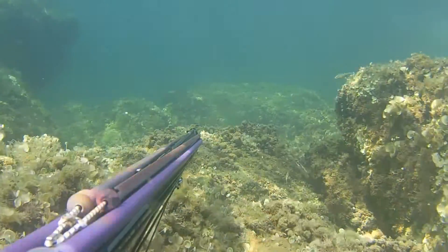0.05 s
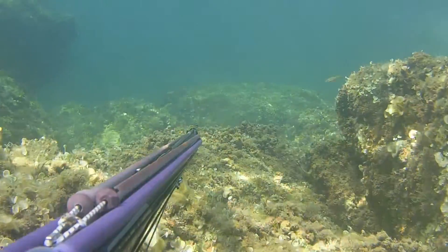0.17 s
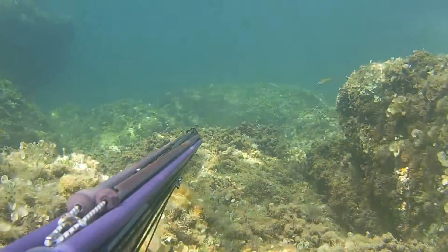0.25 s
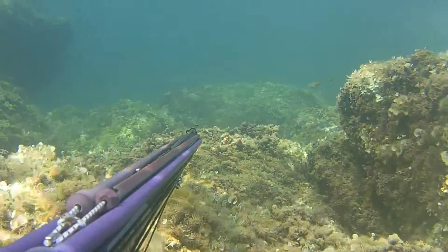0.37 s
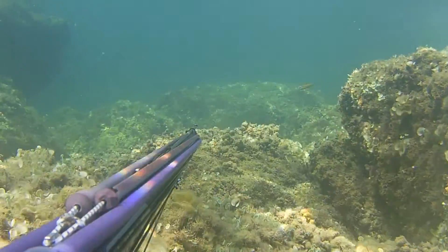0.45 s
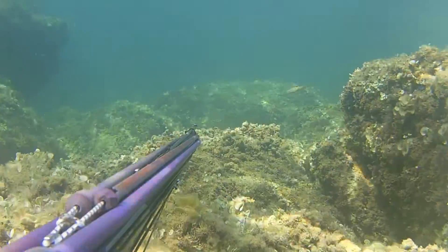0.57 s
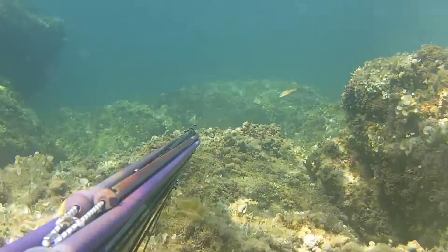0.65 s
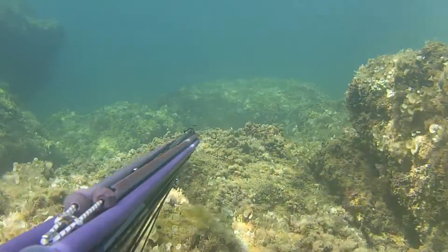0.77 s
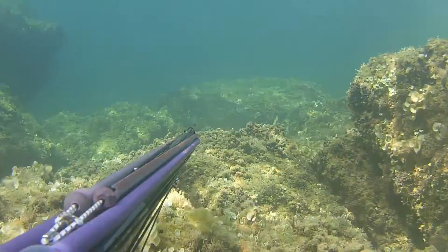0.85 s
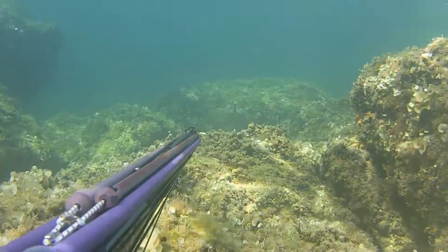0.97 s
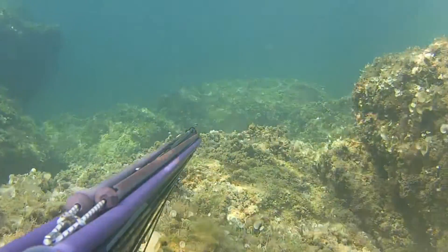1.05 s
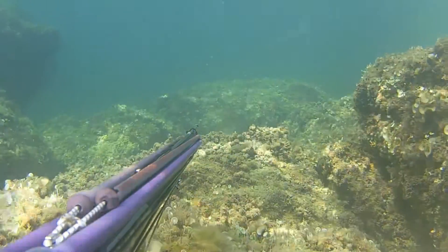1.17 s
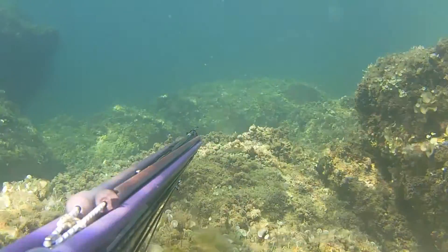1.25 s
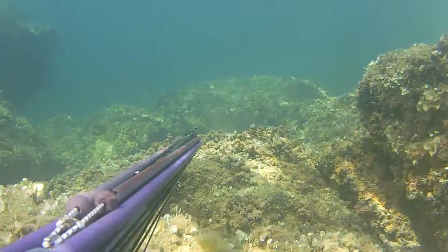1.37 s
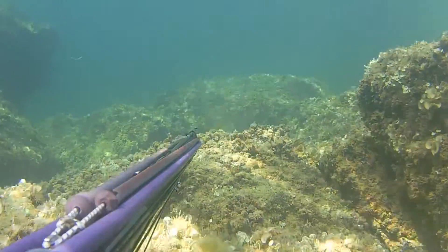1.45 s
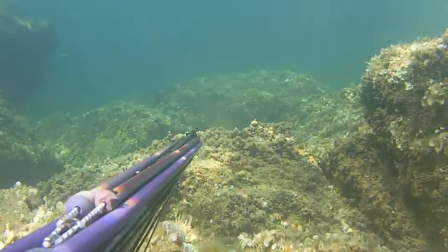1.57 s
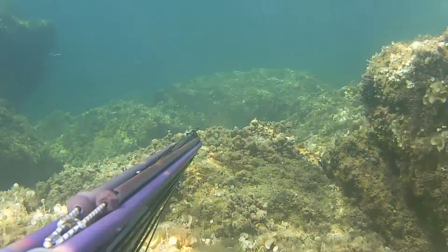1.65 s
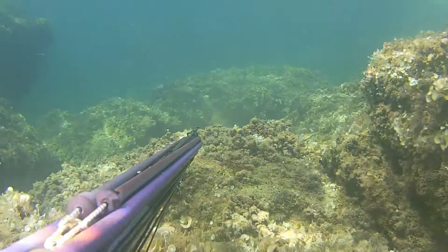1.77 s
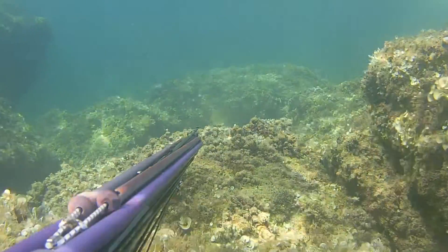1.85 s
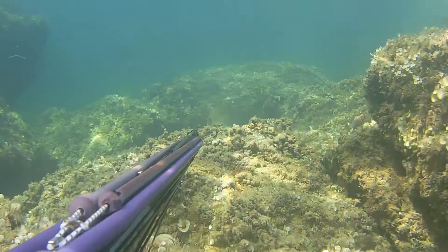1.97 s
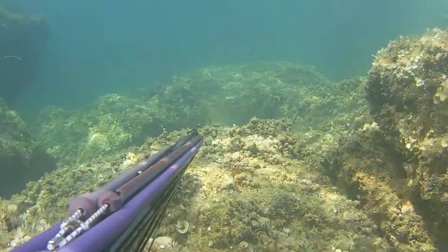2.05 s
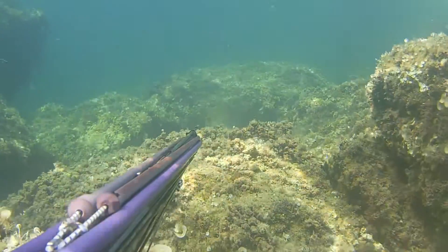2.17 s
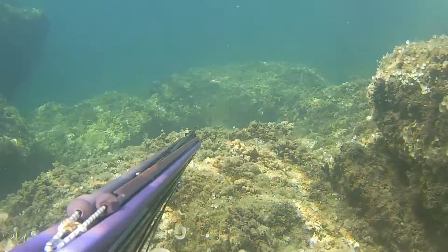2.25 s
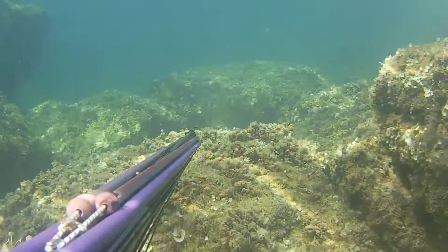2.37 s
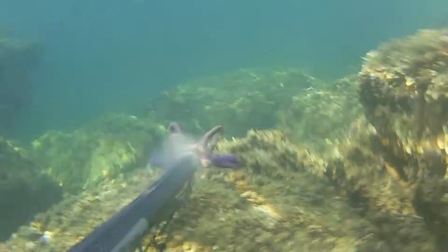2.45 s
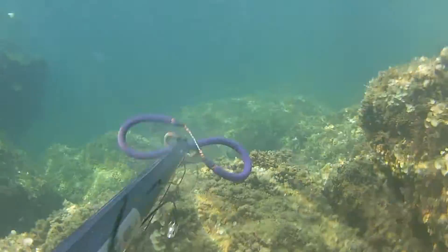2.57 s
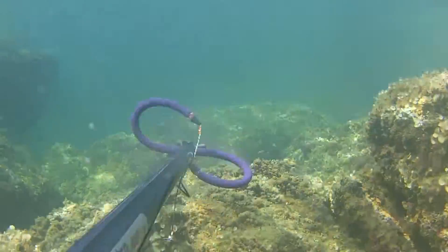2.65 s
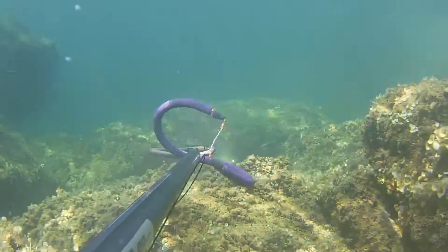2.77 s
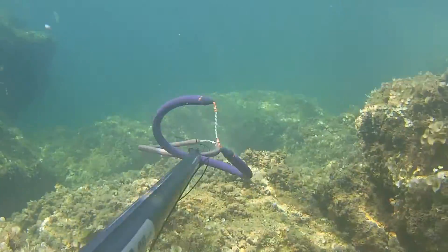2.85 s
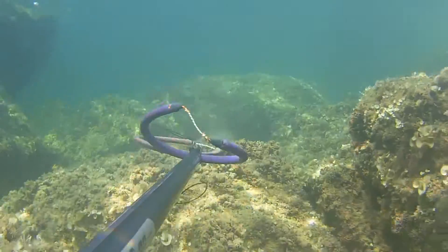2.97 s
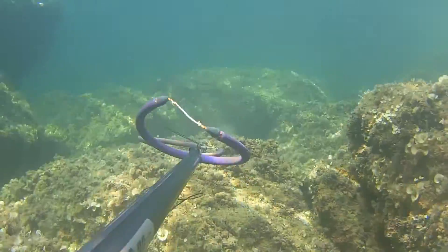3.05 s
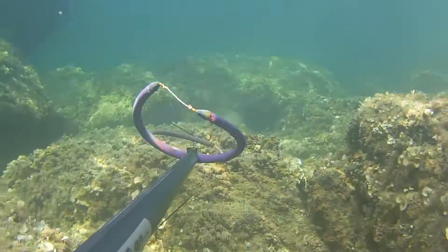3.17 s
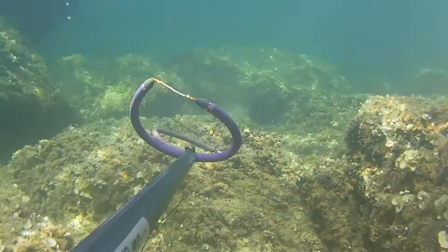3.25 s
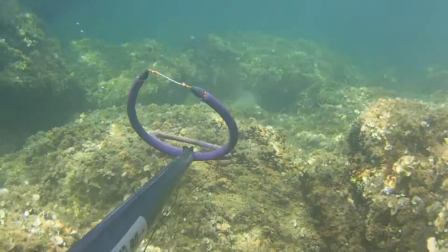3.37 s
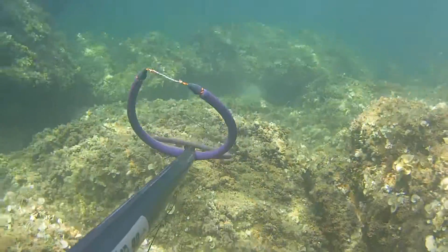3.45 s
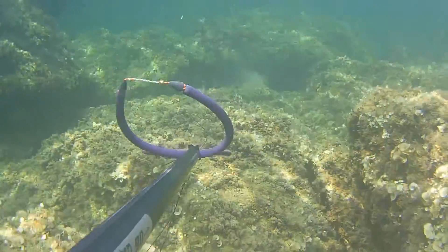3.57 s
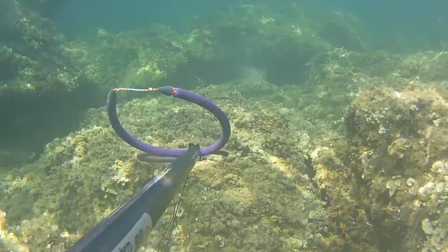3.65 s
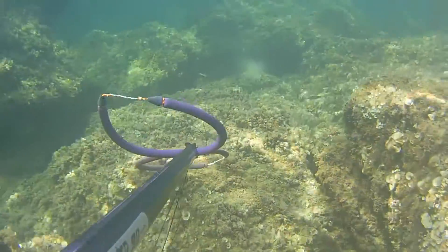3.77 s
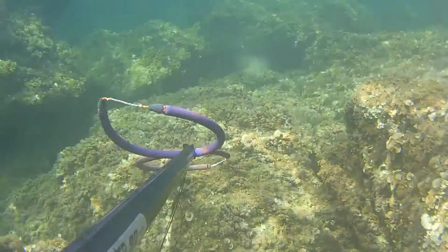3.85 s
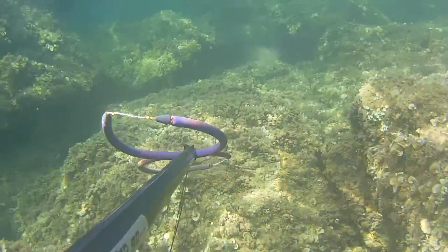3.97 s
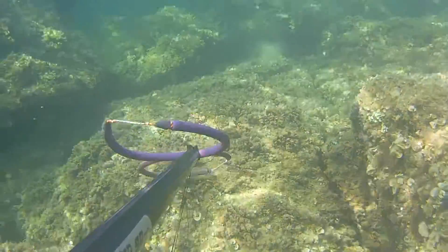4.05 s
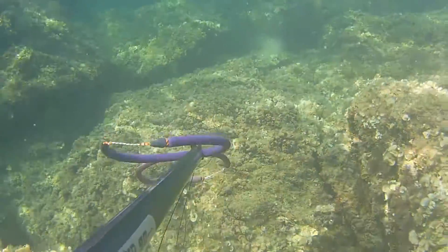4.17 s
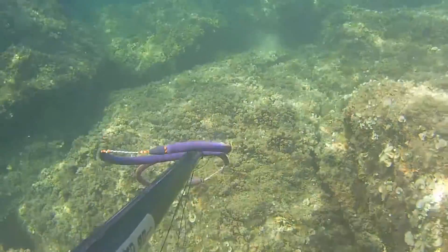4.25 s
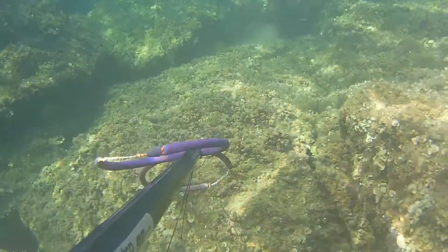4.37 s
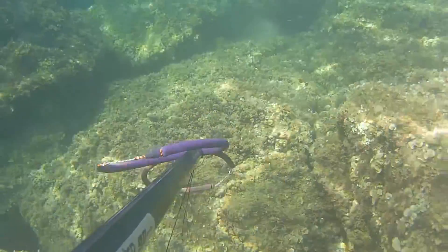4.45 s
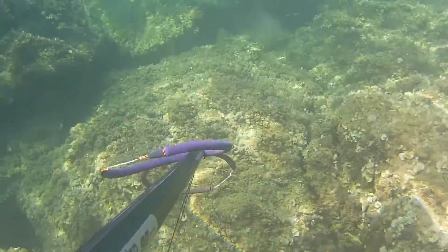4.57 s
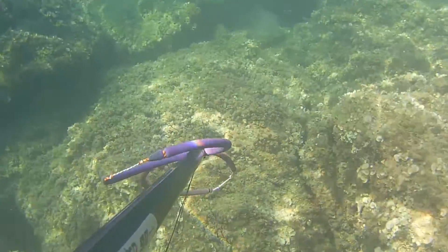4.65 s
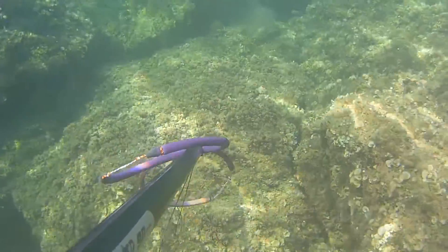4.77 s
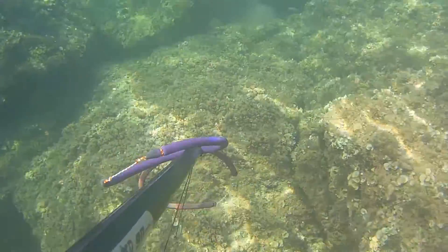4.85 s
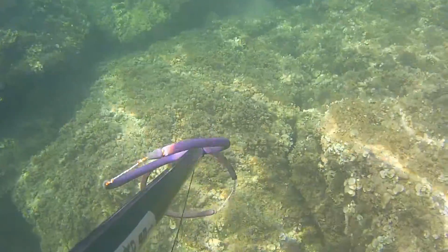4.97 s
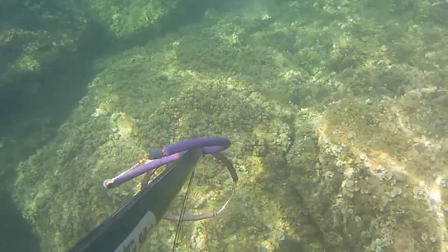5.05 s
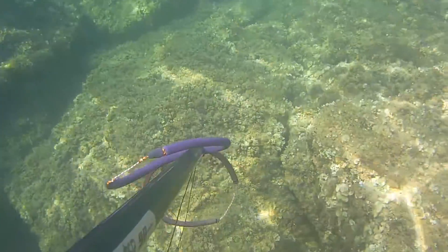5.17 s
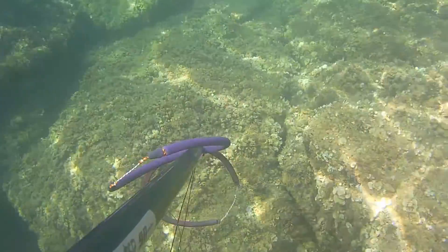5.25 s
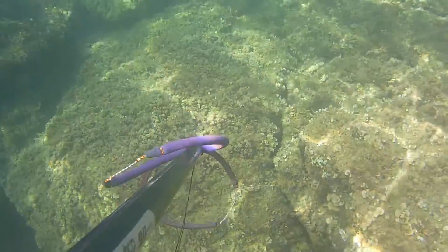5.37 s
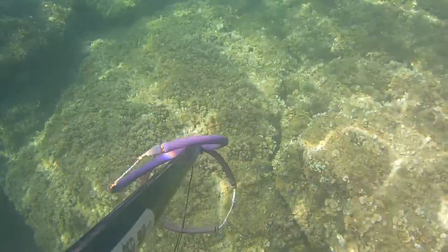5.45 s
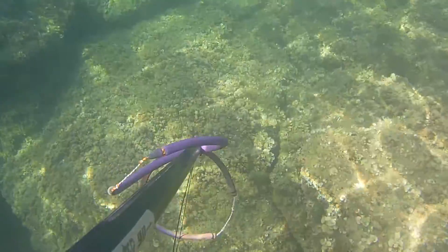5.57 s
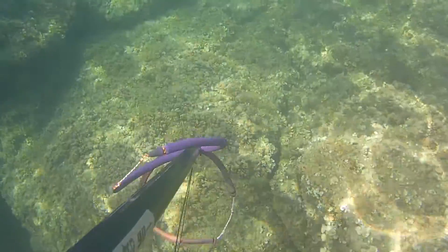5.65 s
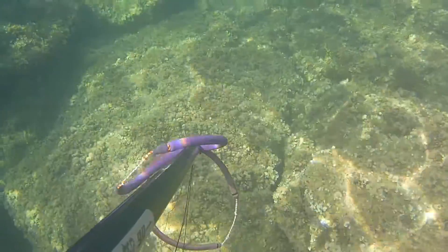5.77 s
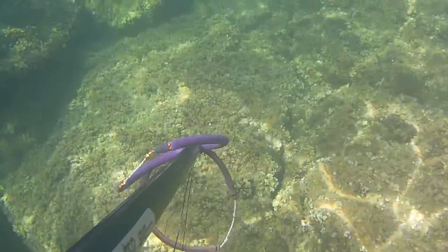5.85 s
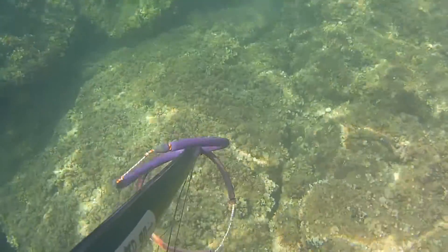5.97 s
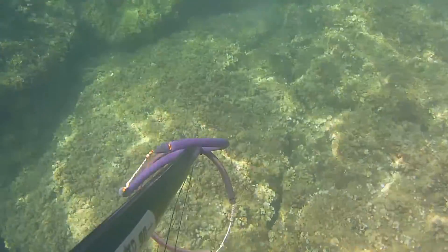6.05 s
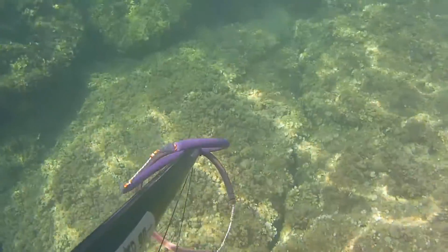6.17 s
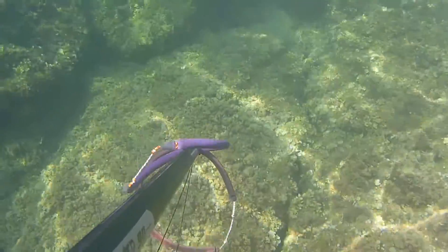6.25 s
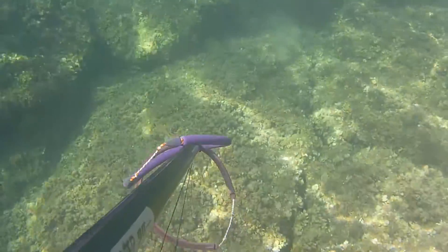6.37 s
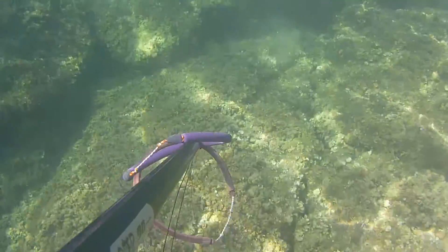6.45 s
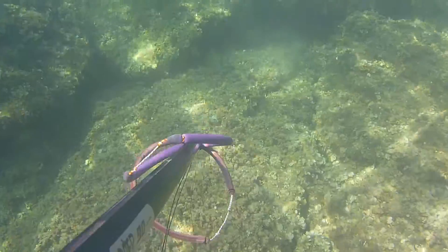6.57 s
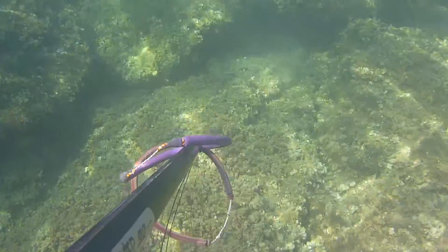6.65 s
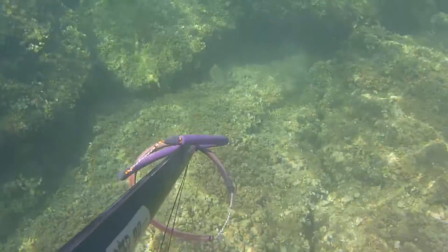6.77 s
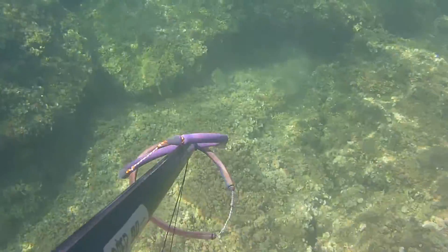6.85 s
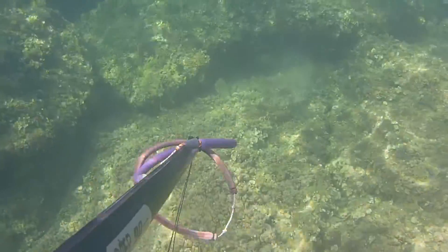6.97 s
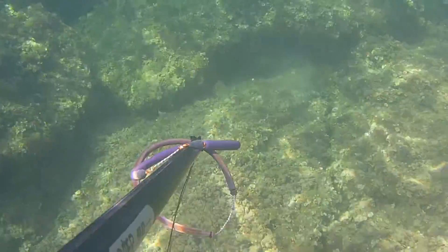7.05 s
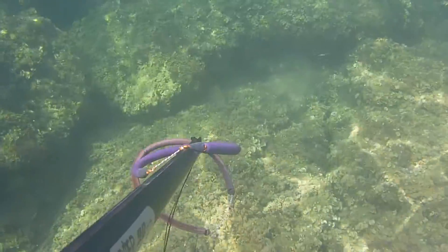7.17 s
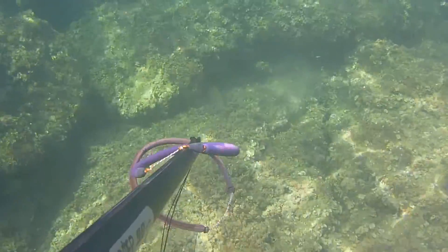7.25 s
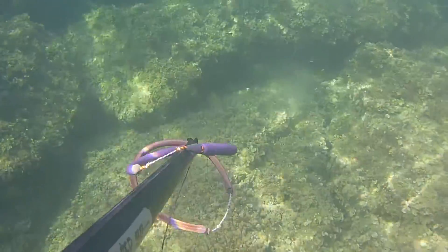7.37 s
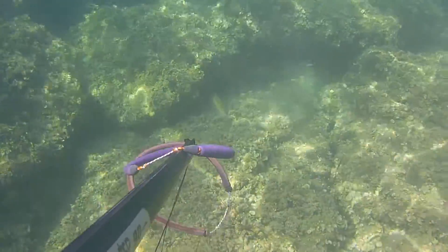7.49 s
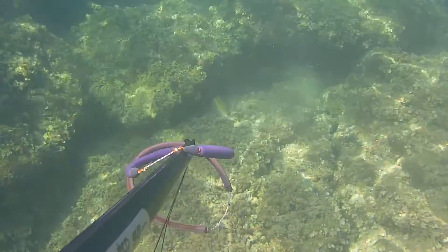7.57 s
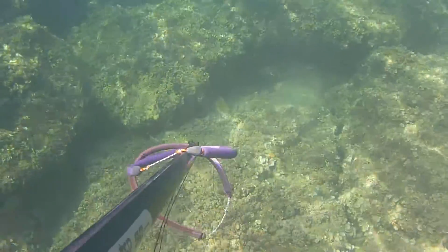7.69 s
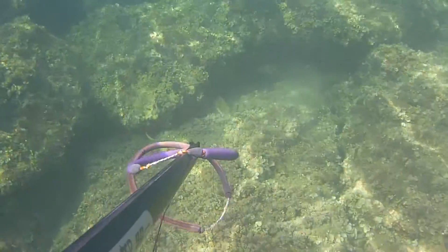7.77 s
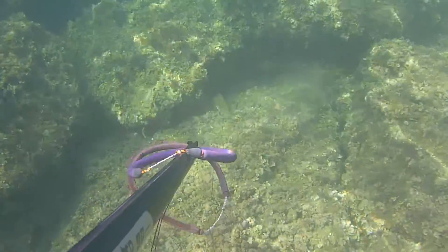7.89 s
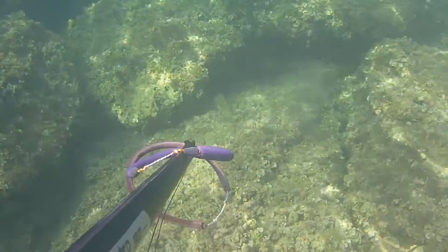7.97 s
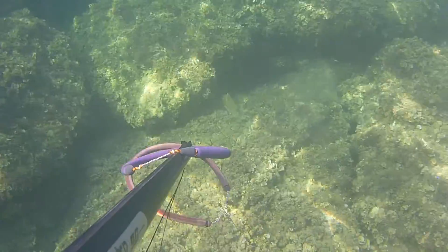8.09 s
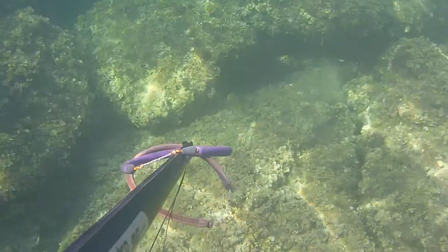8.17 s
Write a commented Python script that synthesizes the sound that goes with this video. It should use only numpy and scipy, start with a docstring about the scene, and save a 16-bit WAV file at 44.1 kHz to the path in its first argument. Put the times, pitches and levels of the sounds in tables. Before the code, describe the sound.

A speargun fires underwater with one loud, sharp crack and thump, over faint scattered clicks and a low water hiss.

```python
"""A rubber-band speargun fires under water, heard from a sealed housing fixed to the gun.
Release, sliding spear and slapping bands ring the barrel's modes and overload the microphone input;
recoil swings the mount. Hand and slack line rub the gun, reef shrimp snap and ring the housing,
and water surges over a steady hiss."""
import sys
import numpy as np
from scipy import signal
from scipy.fft import rfft, irfft
from scipy.io import wavfile

SR = 44100
rng = np.random.default_rng(int(sys.argv[2]) if len(sys.argv) > 2 else 0)


def digitize_waveform(pressure):
    """Quantize a signal to 16-bit integers and store it at the path in sys.argv[1].

    Rows of a 2-D input are taken as channels; values are limited to [-1, 1].
    """
    field = np.atleast_2d(pressure).T
    bounded = np.clip(field, -1, 1)
    quanta = np.round(bounded * 32767).astype(np.int16)
    wavfile.write(sys.argv[1], SR, quanta)


N = 362502

# barrel modes: (frequency [Hz], struck level [dB], rubbed level [dB], t60 [s])
BARREL_MODES = [(289, -12, -16, 0.12), (389, -8, -8, 0.021), (538, -1, -21, 0.017), (609, -7, -24, 0.047),
                (673, -1, 0.5, 0.094), (714.5, -4.5, -20, 0.062), (905, -7.5, -32, 0.022),
                (1097, -6.5, -17, 0.017), (1352, -4, -8, 0.023), (1520, -5.5, -20, .03),
                (1730, -5.5, -29, 0.017), (1986, -25, -11.5, 0.039), (2428, -17.5, -9.5, 0.043),
                (3180, -15.5, -23, 0.011), (3660, -21, -20, 0.03), (4530, -16.5, -26, 0.0081)]


def from_db(db):
    return 10 ** (np.asarray(db) / 20)


def unit_rms(x):
    return x / np.sqrt(np.mean(x ** 2) + 1e-20)


def envelope(times_s, levels_db):
    """Gain through dB points, silent outside them."""
    return from_db(np.interp(np.arange(N) / SR, times_s, levels_db, left=-200, right=-200))


def add(track, time_s, sound):
    start = round(time_s * SR)
    track[start:start + len(sound)] += sound[:N - start]


def ring(force, hz, t60_s):
    """One mode: a unit impulse starts a decaying unit sine."""
    radius = from_db(-60 / (t60_s * SR))
    angle = 2 * np.pi * hz / SR
    return signal.lfilter([0, np.sin(angle)], [1, -2 * radius * np.cos(angle), radius ** 2], force + 1e-18)


def struck(modes, contact_s, detune_per_khz, length_s=0.15):
    """Modes (Hz, dB, t60) swell during contact, then decay; random phase and detuning."""
    hz, db, t60_s = np.transpose(modes)[:, :, None]
    pitch_draw, phase = rng.random((2, len(hz), 1))
    t = np.arange(round(length_s * SR)) / SR
    swell = np.sin(np.pi / 2 * np.minimum(t / contact_s, 1)) ** 2
    decay = from_db(db - 60 * np.maximum(t - contact_s, 0) / t60_s)
    detuned_hz = hz * (1 + detune_per_khz * hz / 1000 * (2 * pitch_draw - 1))
    return swell * np.sum(decay * np.sin(2 * np.pi * (detuned_hz * t + phase)), axis=0)


def blows_and_pops():
    """Blows on the barrel; at 0.048 s and 2.908 s, the low pop of a shrimp snap."""
    # (time [s], level [dB], centre pitch [Hz], contact [s])
    impulses = [(.048, -41, 1900, 0.0046), (2.161, -29, 616, 0.0031), (2.363, -21, 2400, 0.00068),
                (2.3665, 7, 910, 0.00089), (2.374, 3, 1400, .0012), (2.390, -5, 1700, 0.0016),
                (2.408, 5.5, 660, 0.0054), (2.419, 9, 680, 0.003), (2.436, 6.5, 1396, .002),
                (2.445, 6.5, 1700, .003), (2.462, 2, 1500, 0.0021), (2.475, -12.5, 1970, 0.0025),
                (2.497, -30, 716, 0.0053), (2.519, -12, 1550, 0.0025), (2.529, -20.5, 670, 0.0031),
                (2.545, -26, 650, 0.0058), (2.548, -32, 3530, 0.0045), (2.598, -42, 3180, 0.0065),
                (2.597, -29, 1500, 0.0019), (2.622, -26.5, 1050, 0.0024), (2.646, -26.5, 1090, 0.0027),
                (2.647, -34, 3220, 0.0042), (2.674, -42.5, 1500, .004), (2.726, -46.5, 700, 0.0051),
                (2.754, -49, 700, .006), (2.908, -41.5, 1600, 0.0024), (3.703, -36.5, 695, 0.016),
                (3.760, -35, 686, 0.012), (5.150, -38.5, 1400, .005), (5.154, -40, 2400, .005),
                (5.166, -38, 694, .008)]
    out = np.zeros(N)
    for time_s, db, pitch_hz, contact_s in impulses:
        reach_oct = 0.0017 / contact_s   # longer contact, narrower band
        modes = [(hz, db + struck_db - 4 * (np.log2(hz / pitch_hz) / reach_oct) ** 2, t60_s)
                 for hz, struck_db, _, t60_s in BARREL_MODES]
        add(out, time_s, struck(modes, contact_s, detune_per_khz=0.015))
    return out


def barrel_friction():
    """Sliding spear and rubbing hand catch unevenly; the small jolts drive the barrel's modes."""
    # spear and line along the barrel: (time [s], level [dB])
    slide_points = [(2.364, -31), (2.37, 4), (2.39, -5), (2.439, -7.5), (2.464, -16.5), (2.485, -26.5),
                    (2.6, -46), (2.7, -56), (2.9, -67)]
    # hand and slack line: (start [s], hold [s], level [dB], change while held [dB])
    rubs = [(3.558, 0.23, -59, 2.5), (5.146, 0.11, -42.5, -11), (6.562, 0.16, -50, 0)]
    attack_s, release_s, edge_db = 0.0074, 0.22, -15.5
    jolts = unit_rms(rng.standard_normal(N) * from_db(3.4 * rng.exponential(1, N)))
    jolts = signal.sosfilt(signal.butter(2, 4500, fs=SR, output="sos"), jolts)   # wet contact is dull
    rub_gain = sum(envelope(start_s + np.cumsum([0, attack_s, hold_s, release_s]),
                            db + np.array([edge_db, 0, change_db, change_db + edge_db]))
                   for start_s, hold_s, db, change_db in rubs)
    times_s, slide_db = np.transpose(slide_points)
    tilt_db_per_oct = 1.6 + 0.1556 * slide_db   # duller as it weakens
    out = np.zeros(N)
    for hz, struck_db, rubbed_db, t60_s in BARREL_MODES:
        slide_gain = envelope(times_s, slide_db + struck_db + tilt_db_per_oct * np.log2(hz / 700))
        force = jolts * (slide_gain + from_db(rubbed_db) * rub_gain)
        out += ring(force * 3 / np.sqrt(t60_s * SR), hz, t60_s)
    return out


def mount_swing():
    """Recoil and bumps push the mount's low modes, each for a third of its cycle."""
    # (frequency [Hz], level [dB], t60 [s])
    mount_modes = [(35.2, 2, 0.18), (56.8, 4, 0.065), (107.4, -1.5, 0.17), (165, 2, 0.03)]
    # (time [s], level [dB], direction [+/-1], centre pitch [Hz])
    pushes = [(2.368, 6.5, -1, 50), (2.375, -1.5, 1, 36), (2.413, -9, 1, 120), (2.448, -5.5, 1, 60.3),
              (2.455, -6.5, -1, 58.3), (2.481, -30, -1, 100), (2.502, -20, -1, 104),
              (2.546, -23.5, 1, 60.7), (2.598, -25, 1, 110), (2.633, -29, -1, 70.5), (2.66, -35.5, 1, 70),
              (4.204, -32, 1, 90), (4.265, -44, 1, 96), (4.33, -47, 1, 95), (5.151, -33.5, 1, 168),
              (6.669, -38, 1, 104)]
    out = np.zeros(N)
    for hz, mode_db, t60_s in mount_modes:
        pulse = np.hanning(round(SR / hz / 3))
        force = np.zeros(N)
        for time_s, db, direction, pitch_hz in pushes:
            share_db = mode_db - 11 * np.log2(hz / pitch_hz) ** 2
            add(force, time_s, direction * from_db(db + share_db) * pulse / pulse.sum())
        out += ring(force, hz, t60_s)
    return out


def shrimp_snaps():
    """Near snaps and a far crackle ring the housing; each echoes once off the rocks."""
    # housing modes in four groups, low to high: (frequency [Hz], level [dB], t60 [s])
    housing_groups = [
        [(2110, -7.5, 0.0092), (2362, -1.5, 0.022)],
        [(2890, -10, 0.023), (3210, -1.5, 0.011), (3690, -3.5, 0.018)],
        [(4600, -1.5, 0.011), (5240, -3, 0.0048), (6230, -7.5, 0.0091)],
        [(8270, -1.5, .003), (9900, 1, 0.006), (12500, -2, .002), (14800, -7.5, 0.0024)],
    ]
    # (time [s], level [dB], brightness [dB/octave])
    near_snaps = [(0.048, -41.5, -26), (0.193, -55, 6), (0.2157, -39, -1), (0.378, -40, 1.5),
                  (0.5, -57, 11), (0.6858, -47, 1), (0.746, -44, -8), (1.1587, -48, 2),
                  (1.1688, -46.5, 7.5), (1.3655, -50.5, 6.5), (1.5377, -39, -6.5), (1.702, -53.5, 12.5),
                  (1.741, -44, 7), (1.813, -46, -9), (1.936, -50, 6), (1.9636, -46.5, 1.5),
                  (2.3223, -50.5, 5.5), (2.7132, -51, 0), (2.8258, -61.5, 11.5), (2.9086, -40.5, -14),
                  (2.9662, -39, -3), (3.3348, -44.5, -3), (3.5718, -42, -19), (3.623, -45.5, 0),
                  (3.646, -39.5, -4), (3.664, -42.5, 1), (3.7074, -44.5, 0), (3.7683, -40, 2.5),
                  (3.829, -46, 4), (3.8546, -50, -4), (3.895, -53, 9), (3.995, -57.5, 7),
                  (4.287, -49.5, 4.5), (4.3064, -46.5, -1), (4.5059, -41.5, -2.5), (4.559, -52.5, 6),
                  (4.654, -48.5, 6), (4.7769, -53, 7), (4.805, -57, 9.5), (4.8147, -47.5, -5),
                  (5.102, -31.5, -9.5), (5.1362, -53.5, 8), (5.166, -38.5, -5), (5.258, -46.5, -1),
                  (5.3988, -42.5, -13), (5.4739, -53, 6.5), (5.876, -47, -7), (5.9835, -48.5, 0),
                  (6.0317, -51.5, 4), (6.0586, -42, 0.5), (6.144, -48, 7), (6.222, -51, 3),
                  (6.2677, -44, 3), (6.3934, -45, -11), (6.41, -54, 8.5), (6.59, -48.5, 3.5),
                  (6.704, -48, 3), (6.7979, -27.5, -23), (6.804, -54, 12.5), (6.908, -51.5, 10.5),
                  (6.917, -62, 16.5), (7.122, -41, -0.5), (7.198, -45, 2.5), (7.4839, -52, 5),
                  (7.9124, -49, 15), (7.9583, -44, 5), (7.9874, -40.5, -2), (8.0544, -57, 13.5)]
    near_group_db, far_group_db = [3, -1.5, -7, -19], [1.5, -2.5, -2.5, -12]
    tilt_pivot_hz, tilt_limit_hz = 2260, 5260
    far_per_s, far_spread_db, echo_db = 42, 18, -12
    group_hz = [np.mean(group, axis=0)[0] for group in housing_groups]
    octaves = np.log2(np.minimum(group_hz, tilt_limit_hz) / tilt_pivot_hz)
    near = [(time_s, *(db + tilt * octaves + near_group_db)) for time_s, db, tilt in near_snaps]
    when, size, colour = np.hsplit(rng.random((round(far_per_s * N / SR), 6)), [1, 2])
    size_db = -64.5 - 3 * np.log(size + 0.04)   # many faint, few loud
    far = np.hstack([when * N / SR, size_db + far_group_db + far_spread_db * (colour - 0.5)])
    out = np.zeros(N)
    for time_s, *levels_db in [*near, *far]:
        modes = [(hz, db + group_db, t60_s)
                 for group, group_db in zip(housing_groups, levels_db) for hz, db, t60_s in group]
        snap = struck(modes, contact_s=0.0009, detune_per_khz=0.01, length_s=0.034)
        add(out, time_s, snap)
        echo_s = min(time_s + rng.uniform(0.002, 0.0067), (N - 1) / SR)
        add(out, echo_s, from_db(echo_db) * snap)
    return out


def water_surge():
    """Water rumbles round the housing as the diver moves."""
    # (time [s], level [dB])
    surge_points = [(2.72, -48.5), (2.83, -60), (4.14, -68), (4.2, -46.5), (4.7, -70.5), (4.89, -57),
                    (5.12, -71.5), (5.16, -48), (5.31, -69), (6.2, -57.5), (6.21, -64.5), (6.9, -51),
                    (7.18, -60), (7.27, -76), (7.3, -59), (8.2, -61.5)]
    band = signal.butter(2, [25, 110], "band", fs=SR, output="sos")
    rumble = unit_rms(signal.sosfilt(band, rng.standard_normal(N)))
    return envelope(*np.transpose(surge_points)) * rumble


def steady_hiss():
    """Noise of water and microphone."""
    # (frequency [Hz], relative density [dB])
    hiss_spectrum = [(12, -27), (20, -3), (91, -1.5), (150, 0.5), (337, -1.5), (678, -6.5), (1910, -18),
                     (2390, -19.5), (2670, -22), (3740, -23.5), (4180, -25.5), (14700, -38), (16000, -42)]
    rms_db = -51.5
    points_hz, points_db = np.transpose(hiss_spectrum)
    bins_hz = np.arange(N // 2 + 1) * SR / N + 1
    colour = from_db(np.interp(np.log(bins_hz), np.log(points_hz), points_db))
    return from_db(rms_db) * unit_rms(irfft(rfft(rng.standard_normal(N)) * colour, N))


def scene():
    events = blows_and_pops() + barrel_friction() + mount_swing() + shrimp_snaps()
    return (events + steady_hiss() + water_surge())[None]


def record(dry):
    """The input overloads with nearly flat tops, then the treble is cut."""
    clip_level, leak_db, stopband_hz = 0.47, -33, 17000
    clipped = dry / (1 + np.abs(dry / clip_level) ** 8) ** (1 / 8)
    lowpass = signal.cheby2(12, 70, stopband_hz, fs=SR, output="sos")
    return signal.sosfilt(lowpass, clipped + from_db(leak_db) * dry)


dry = scene()
out = record(dry)
digitize_waveform(out)
```